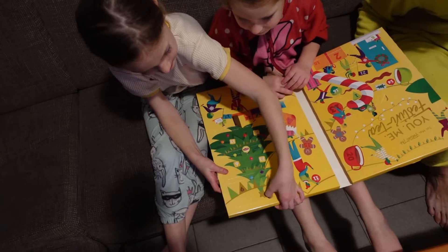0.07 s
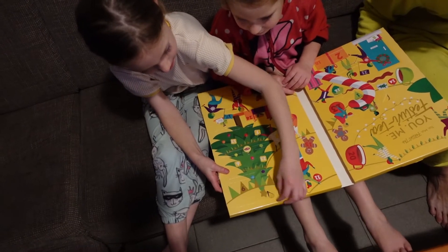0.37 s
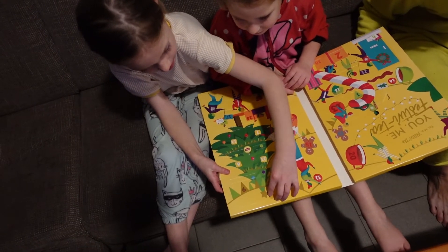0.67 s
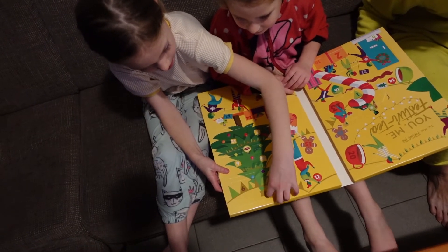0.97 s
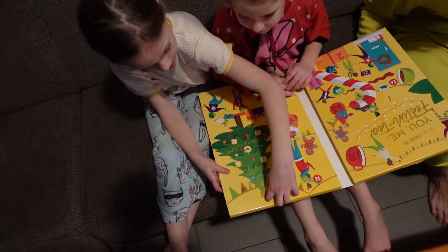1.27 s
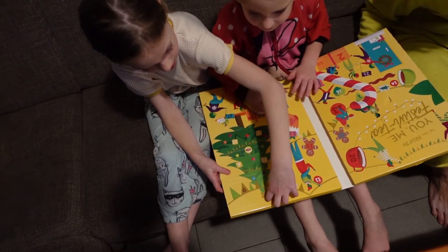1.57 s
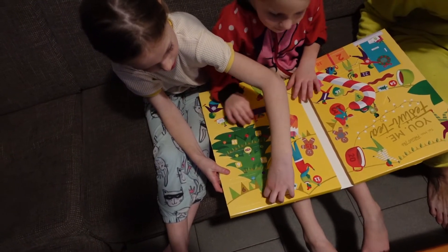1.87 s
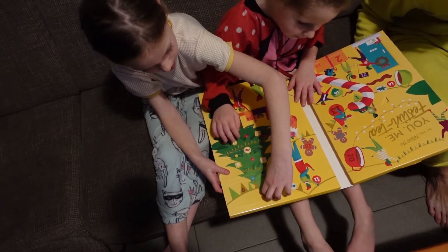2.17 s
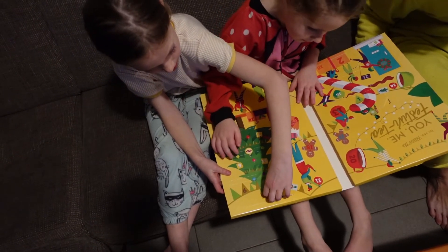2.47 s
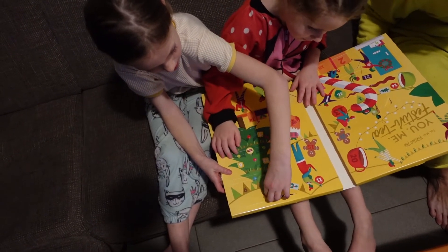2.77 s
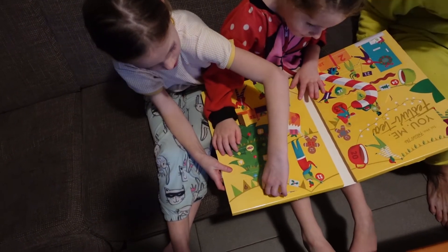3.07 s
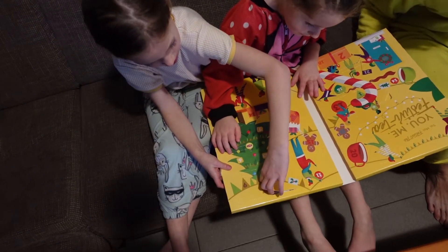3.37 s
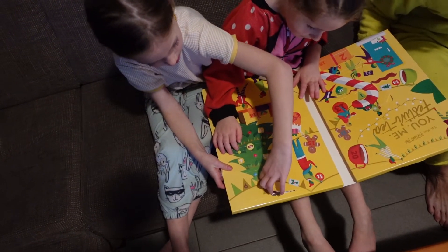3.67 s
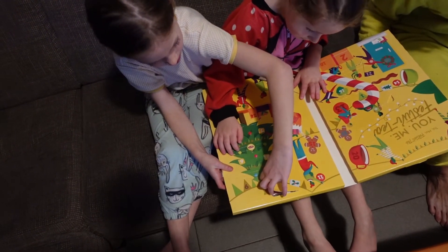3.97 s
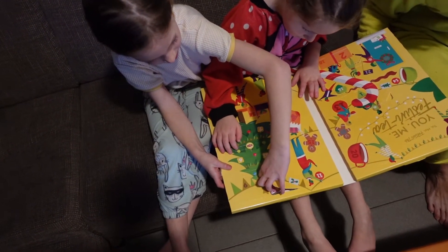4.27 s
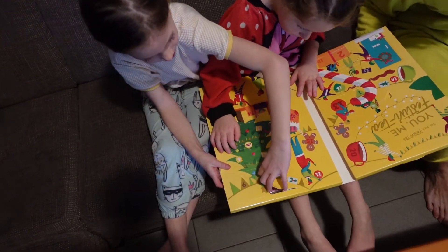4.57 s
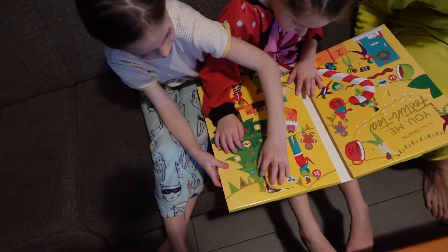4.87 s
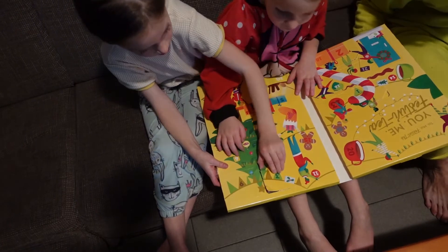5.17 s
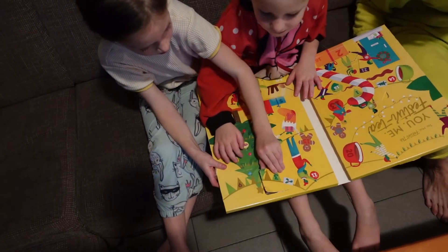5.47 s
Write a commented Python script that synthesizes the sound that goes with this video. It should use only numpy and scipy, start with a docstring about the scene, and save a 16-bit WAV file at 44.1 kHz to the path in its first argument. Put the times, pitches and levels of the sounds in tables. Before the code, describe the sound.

Fingers pry at the perforated doors of a big cardboard calendar in a quiet living room. Soft rubs and nail scrapes lead to a quick cluster of sharp cracks, then three separate, louder snaps, another short cluster and a last tear, ending in light ticking. Each crack knocks the hollow box slightly and has a short room echo. The nearby handheld microphone adds a low rumble and faint hiss.

```python
"""Paper bridges crack as two children pry at the perforated doors of a big cardboard calendar on their laps.
Each bridge fractures in milliseconds, an impulse that rings the door flap and thumps the hollow box. In
between, nails tick, fingers rub and judder, a sleeve brushes the lid and fine fibres crackle as doors rip open.
The living room answers with a short reverberation; the hand holding the phone adds a low rumble."""
import sys
import numpy as np
from scipy import signal
from scipy.fft import rfft, irfft
from scipy.io import wavfile
from scipy.ndimage import uniform_filter1d

SR = 44100
rng = np.random.default_rng(int(sys.argv[2]) if len(sys.argv) > 2 else 0)


def generate_wav(sig):
    """Save sig (samples, or channels by samples) to the path in sys.argv[1] as 16-bit PCM at SR."""
    pcm = np.round(np.clip(np.atleast_2d(sig).T, -1, 1) * 32767).astype(np.int16)
    wavfile.write(sys.argv[1], SR, pcm)


N = 251811
TIME = np.arange(N) / SR

# Spectra of still air with microphone hiss, the hand on the phone, rubbed card and tearing card.
# Each row: frequency in Hz, relative spectral density in dB.
AIR_SPECTRUM = [(41, -71), (70, -14), (108, -5.5), (364, -11.5), (457, -9.5), (585, -15.5), (1180, -15.5),
                (1380, -22.5), (1690, -14), (1980, -24), (8420, -29.5), (10600, -32.5), (15500, -33.5)]
HANDLING_SPECTRUM = [(8, 10.5), (18, -10.5), (28, 6.5), (38, -8.5), (50, -17), (75, -25.5), (130, -34.5),
                     (300, -64.5)]
RUB_SPECTRUM = [(88, -68), (150, -10.5), (445, -2), (583, -5.5), (781, -3.5), (912, -1), (1200, 3.5),
                (1480, -10), (1630, -3.5), (2140, -7), (5130, -17), (8490, -24.5), (10500, -33),
                (15500, -33)]
TEAR_SPECTRUM = [(100, -24), (200, -10), (450, -4.5), (580, -11), (800, -2), (1100, 0), (1500, -9),
                 (2000, -11.5), (2900, -13), (3800, -17), (5500, -16), (8800, -17.5), (11000, -28.5),
                 (15000, -31.5)]
# Shifts of grip on the phone. Each row: time of the peak in seconds, level in dB.
GRIPS = [(.19, -45.5), (.475, -41), (3.081, -38), (4.38, -38)]
# Fingers and sleeves sliding on the card. Each row: start and end in seconds, first and last relative
# level in dB, offset of the hiss in dB.
STROKES = [(0, 0.124, -41, -52, -9), (.74, 0.876, -54, -54.5, -25), (1.138, 1.366, -45, -49.5, -9),
           (2.01, 2.517, -54.5, -47, -4.5), (3.047, 3.17, -62, -46, -8), (4.615, 4.89, -59.5, -44, -3),
           (5.057, 5.37, -45, -56.5, -1), (5.6, 5.71, -53, -44, -21)]
# Scrapes along a door's edge. Each row: start and length in seconds, level in dB, grit from 0 (skin)
# to 1 (nail).
SCRAPES = [(0.158, 0.056, -44.5, 0.6), (0.216, 0.035, -40.5, 0.32), (0.394, 0.15, -72, 0.083),
           (.67, 0.049, -54, .36), (0.954, .1, -62, 0.046), (1.528, 0.031, -27.5, 0.53),
           (1.696, 0.013, -30.5, 0.76), (2.568, 0.017, -46, .8), (2.599, 0.043, -39.5, 0.28),
           (2.77, 0.03, -37, 0.87), (2.877, 0.011, -54, 0.47), (2.952, 0.13, -50.5, 0.056),
           (4.612, 0.058, -51, 0.25), (4.665, 0.047, -39, 0.36), (4.732, .033, -48.5, 0.34),
           (4.909, 0.066, -29, 0.41), (5.258, 0.037, -50.5, 0.56), (5.384, 0.021, -38, 0.82)]
# Reverberation of the room. Each row: frequency in Hz, time to fall 60 dB in seconds, relative level in dB.
ROOM_DECAY = [(180, 0.45, 0.5), (500, 0.41, 1), (1230, 0.47, 0), (2800, 0.5, 1), (5800, 0.49, 0),
              (8900, 0.38, -0.5), (12900, 0.29, 1)]
# Resonances of the hollow box. Each row: frequency in Hz, width in Hz, boost in dB.
BOX_MODES = [(245, 47, 3), (446, 18, 4.5), (659, 78, 5), (798, 26, 4), (1050, 690, 6), (1580, 170, 3.5),
             (2094, 23, 4.5), (2700, 460, 0.5)]
# The ranges of thud, body, snap and fizz. Each row: lower edge in Hz, upper edge in Hz.
BANDS = [(95, 650), (650, 1600), (1600, 4200), (4200, 15000)]
# Nail ticks and small creaks of the card. Each row: start in seconds, relative level in dB, pitch in Hz.
TICKS = [(0.0806, -33.5, 870), (0.1614, -49, 4060), (.218, -39, 2200), (0.233, -44, 6000),
         (0.6305, -48, 700), (0.6872, -47, 4600), (0.9125, -52.5, 8500), (1.5008, -40, 4740),
         (2.352, -54, 8000), (2.416, -54.5, 7000), (2.51, -43, 1000), (2.7721, -43.5, 1110),
         (2.7896, -49, 3200), (3.1258, -44.5, 794), (3.1464, -44, 1140), (3.3545, -37.5, 595),
         (3.4204, -37.5, 620), (3.456, -33.5, 610), (3.487, -37.5, 700), (3.8293, -43.5, 5970),
         (4.684, -42, 650), (4.818, -42, 403), (5.0596, -41, 1620), (5.11, -39.5, 1270),
         (5.2247, -47, 3770), (5.2428, -49, 4000), (5.2665, -47, 2580), (5.312, -42, 770),
         (5.389, -45, 980), (5.413, -40, 1400), (5.4794, -37.5, 580), (5.5328, -38.5, 1500),
         (5.57, -38, 960), (5.7028, -40, 3380)]
# Fine card fibres ripping as a door tears open. Each row: start in seconds, length in seconds, level in dB.
RIPS = [(0.156, 0.13, -59), (1.53, 0.055, -41), (2.583, 0.035, -53), (4.261, 0.035, -44.5),
        (4.335, 0.016, -39.5)]
# A sleeve brushing the lid. Each row: start in seconds, length in seconds, pitch in Hz, level in dB.
SWISHES = [(0.405, 0.12, 8600, -66), (2.191, 0.22, 3860, -55)]
# A pressed fingertip juddering. Each row: start and end in seconds, slips per second, level in dB.
JUDDERS = [(0.764, 0.883, 46, -57.5), (0.971, 1.054, 49, -52), (1.131, 1.26, 85, -56),
           (1.286, 1.35, 24, -49), (2.029, 2.092, 75, -53.5)]
# Bridges giving way. Each row: start in seconds, relative level in dB, flap pitch in Hz, flap's share of
# the body from 0 to 1, edge pitch in Hz, sharpness in dB, thud against body in dB, tear time in seconds.
CRACKS = [(1.369, -13, 1276, 0.42, 1920, 0, -10.5, 0.002), (1.536, -16, 1290, 0.5, 6660, 3.5, -15, 0.0031),
          (1.551, -14, 1050, 0.2, 1720, -1, -12, 0.0025), (1.5626, -23, 1100, 0.5, 5000, -3, -11, 0.00075),
          (1.5734, -18, 1000, 0.28, 2130, -2.5, -7, 0.0039),
          (1.717, -15.5, 1045, 0.17, 2130, -2, -14, 0.0067),
          (1.7831, -17, 1044, 0.38, 3680, 0, -11, 0.0057),
          (1.827, -17, 1050, 0.24, 7560, -1.5, -6.5, 0.0037),
          (2.584, -25, 1140, 0.3, 5950, 1.5, -6, 0.0052), (2.619, -36.5, 1680, 0.3, 3090, 4.5, 2, 0.0085),
          (3.1826, -10.5, 1044, 0.71, 2500, -5, -14.5, 0.000625),
          (3.5388, -10, 1080, 0.58, 5840, 0.5, -12, 0.00091),
          (3.941, -9, 1290, 0.35, 3700, 0, -11.5, 0.00053),
          (4.2595, -14.5, 1240, 0.28, 2700, 2.5, -5, 0.0035),
          (4.2926, -20.5, 1630, 0.22, 5100, 6, -5, 0.0035),
          (4.3338, -21.5, 1130, 0.7, 8900, 6, -3.5, 0.003),
          (4.3398, -15.5, 676, 0.22, 7200, -4.5, -4.5, 0.0046),
          (4.917, -28, 1580, 0.2, 3700, 8.5, -5, 0.0038), (4.958, -20.5, 1180, 0.25, 4370, -3, -7, 0.0096)]

TYPICAL_TEAR_S, TYPICAL_EDGE_HZ = 0.0023, 4200
BLOW_S = 0.01  # a short sound's level is that of its energy spread over this time


def undb(db):
    """Amplitude grows tenfold for every 20 dB."""
    return 10 ** (np.asarray(db) / 20)


def unit(x):
    """Normalise to an rms amplitude of 1."""
    return x / np.sqrt(np.mean(x ** 2) + 1e-20)


def blow(x, db):
    """Energy is power times duration: give a transient the energy this level carries in BLOW_S."""
    return x * undb(db) * np.sqrt(BLOW_S * SR / (np.sum(x ** 2) + 1e-20))


def add(track, start, x):
    """Superposition: x adds to the track from start, in seconds."""
    i = max(int(start * SR), 0)
    track[i:i + len(x)] += x[:max(len(track) - i, 0)]


def band(x, low_hz, high_hz, order=3):
    """A causal band-pass filter."""
    return signal.lfilter(*signal.butter(order, [low_hz, high_hz], "band", fs=SR), x)


def contour(points, size):
    """Interpolate (Hz, value) points over log frequency at the bins of a transform."""
    hz, value = np.transpose(points)
    return np.interp(np.log(np.fft.rfftfreq(size, 1 / SR) + 1), np.log(hz), value)


def colour(x, spectrum):
    """Filtering multiplies spectra; the result has rms 1."""
    return unit(irfft(rfft(x) * undb(contour(spectrum, len(x))), len(x)))


def wander(per_s):
    """A moving average smooths random steps into a drift of rms 1."""
    step = int(SR / per_s)
    steps = np.repeat(rng.standard_normal(N // step + 1), step)[:N]
    return unit(uniform_filter1d(steps, step))


def air_and_handling(air_db=-56, hand_db=-39, grip_s=0.072):
    """Structure-borne noise: over quiet air, the hand rumbles on the phone, more as its grip shifts."""
    air = colour(rng.standard_normal(N), AIR_SPECTRUM) * undb(air_db + 0.46 * wander(1.8))
    hand = colour(rng.standard_normal(N), HANDLING_SPECTRUM)
    hand /= np.sqrt(uniform_filter1d(hand ** 2, SR // 6))  # even out the noise's own swells
    shifts = sum(undb(db) * np.exp(-((TIME - peak) / grip_s) ** 2) for peak, db in GRIPS)
    return air + hand * (undb(hand_db + 2 * wander(9)) + shifts)


def friction(grain_db, slip_db, split_hz=2500, grain_samples=14):
    """Stick-slip friction releases uneven grains in surges; returns a dull body and a dry hiss."""
    grains = np.repeat(rng.exponential(size=N // grain_samples + 1), grain_samples)[:N]
    roughness = undb(grain_db * np.minimum(grains, 4))
    rub = colour(rng.standard_normal(N) * roughness, RUB_SPECTRUM) * undb(slip_db * wander(120))
    return np.array([unit(band(rub, 184, split_hz)), unit(band(rub, split_hz, 14000))])


def rubbing(fade_s=0.034, light_scrape_db=-51):
    """Friction noise grows with pressure: skin slides softly on the card, a nail scrapes coarsely."""
    skin = friction(grain_db=2.2, slip_db=1.5)
    nail = friction(grain_db=5.5, slip_db=2.5)
    out = np.zeros(N)
    for start, end, first_db, last_db, hiss_db in STROKES:
        contact = np.clip(np.minimum(TIME - start, end - TIME) / fade_s + 1, 0, 1)
        pressure = undb(np.interp(TIME, [start, end], [first_db, last_db]))
        body, hiss = skin
        out += contact * pressure * (body * undb(-3) + hiss * undb(hiss_db - 4))
    for start, length_s, db, grit in SCRAPES:
        span = slice(int(start * SR), int((start + length_s) * SR))
        body, hiss = np.sqrt(1 - grit) * skin[:, span] + np.sqrt(grit) * nail[:, span]
        hiss_db = (db + light_scrape_db) / 2  # pressing adds more body than hiss
        along = np.linspace(0, 1, len(body))
        arch = 2 * np.sqrt(along * (1 - along))
        add(out, start, arch * (body * undb(db) + hiss * undb(hiss_db)))
    return out


def room(x, first_s=0.0018, build_s=0.0096, early_db=3, early_s=0.0053):
    """Reverberation: sofa and floor reflect first, then the walls' diffuse field decays exponentially."""
    t = np.arange(SR * 3 // 4) / SR
    noise = rfft(rng.standard_normal(len(t)))
    tail = np.zeros(len(t))
    for hz, t60, db in ROOM_DECAY:
        weight = contour([(row[0], row[0] == hz) for row in ROOM_DECAY], len(t))
        tail += undb(db - 60 * t / t60) * irfft(noise * weight, len(t))
    tail *= np.clip((t - first_s) / build_s, 0, 1) * undb(early_db * np.exp(-t / early_s))
    return signal.fftconvolve(x, tail / np.sqrt(np.sum(tail ** 2)))[:N]


def card_response(size=2048):
    """The box's impulse response: modal peaks on the card's spectrum, with minimum phase."""
    hz = np.fft.rfftfreq(size, 1 / SR)
    modes_db = sum(db / (1 + (2 * (hz - centre) / width) ** 2) for centre, width, db in BOX_MODES)
    cepstrum = irfft(np.log(undb(contour(TEAR_SPECTRUM, size) + modes_db)))
    # folding the cepstrum onto positive time gives the promptest causal response
    cepstrum[1:size // 2] *= 2
    cepstrum[size // 2 + 1:] = 0
    return irfft(np.exp(rfft(cepstrum)))


def fibres(card, tear_s, spray_db, settle_db, settle_s):
    """Source and filter: one break, a spray of snapping fibres and a settling crinkle drive the card."""
    t = np.arange(len(card)) / SR
    tearing = np.exp(-t / tear_s)
    snaps = rng.standard_normal(len(t)) * rng.exponential(size=len(t))
    crinkle = rng.standard_normal(len(t)) * np.exp(-t / settle_s) * (1 - tearing)
    force = blow(snaps * tearing, spray_db) + blow(crinkle, settle_db)
    force[0] += np.sqrt(BLOW_S * SR)  # the break, an impulse of 0 dB
    return signal.fftconvolve(force, card)[:len(t)]


def ticks(card, rise_db_per_octave=3, fall_db_per_octave=6):
    """Weak impulses excite the box as nails catch and the card creaks, each loudest near one pitch."""
    out = np.zeros(N)
    centres_hz = np.sqrt(np.prod(BANDS, axis=1))
    for start, db, hz in TICKS + fumbles():
        tear = fibres(card, tear_s=0.0025, spray_db=8, settle_db=-1, settle_s=0.009)
        octaves = np.log2(centres_hz / hz)
        levels_db = db + octaves * np.where(octaves < 0, rise_db_per_octave, -fall_db_per_octave)
        for edges, band_db in zip(BANDS, levels_db):
            add(out, start, blow(band(tear, *edges), band_db))
    return undb(3) * out


def rips(grain_db=4, band_hz=(8500, 18300)):
    """Tiny fractures of fine card fibres ripping merge into a bright, fading crackle."""
    out = np.zeros(N)
    for start, length_s, db in RIPS:
        size = int(length_s * SR)
        grains = rng.standard_normal(SR // 4)
        grains *= undb(grain_db * np.minimum(rng.exponential(size=len(grains)), 4))
        crackle = band(grains, *band_hz, order=2)[:size]
        fade = np.sqrt(np.linspace(1, 0, size))
        add(out, start, unit(crackle * fade) * undb(db))
    return out


def swishes():
    """Cloth sliding on glossy card makes narrow-band friction noise that swells and fades."""
    out = np.zeros(N)
    for start, length_s, hz, db in SWISHES:
        hiss = unit(band(rng.standard_normal(SR), 0.95 * hz, 1.05 * hz, order=1))
        size = int(length_s * SR)
        add(out, start, hiss[:size] * np.sqrt(np.hanning(size)) * undb(db))
    return out


def judders(card, slip_s=0.012, unevenness=0.1, scatter_db=5):
    """Stick-slip oscillation: a fingertip slips at uneven steps, each a brief soft rub on the box."""
    out = np.zeros(N)
    slip = np.hanning(int(slip_s * SR))
    for start, end, rate, db in JUDDERS:
        chance = rng.standard_normal((30, 2 + len(slip)))
        timing, strengths, noises = chance[:, 0], chance[:, 1], chance[:, 2:]
        times = start + (np.cumsum(np.exp(unevenness * timing)) - 1) / rate
        for onset, strength, noise in zip(times[times < end], strengths, noises):
            rub = band(signal.fftconvolve(slip * noise, card), 259, 1800, order=2)
            add(out, onset, blow(rub, db + scatter_db * strength))
    return out


def strain(door, length_s):
    """Under rising stress the first fibres fail, in a growing crackle just before the break."""
    force = rng.standard_normal(len(door))[:int(length_s * SR)]
    return signal.fftconvolve(force * np.linspace(0, 1, len(force)), door)


def flap_ring(hz, size, decay_cycles=4, rise_s=0.00022):
    """Free vibration: the released flap springs back as a damped oscillator."""
    t = np.arange(size) / SR
    swing = np.sin(2 * np.pi * hz * t) * np.exp(-t * hz / decay_cycles) * (1 - np.exp(-t / rise_s))
    return blow(band(swing, 400, 4300, order=2), 0)


def box_bounce(hz=124, decay_s=0.012):
    """A damped mass on a spring: the whole box bounces on the laps when a bridge lets go."""
    t = np.arange(SR // 8) / SR
    return np.sin(2 * np.pi * hz * t) * np.exp(-t / decay_s)


def crack(tear, flap, share, levels_db):
    """Four bands superpose: the box's thud, a body with the flap's note, the fibres' snap and fizz."""
    thud, body, snap, fizz = (blow(band(tear, *edges), 0) for edges in BANDS)
    body = share * flap + (1 - share) * body
    return sum(blow(part, db) for part, db in zip((thud, body, snap, fizz), levels_db))


def tearing_bridges(card):
    """Fracture releases stored elastic energy; returns the direct sound and what goes to the room."""
    direct, to_room = np.zeros(N), np.zeros(N)
    for start, db, flap_hz, share, edge_hz, sharp_db, thud_db, tear_s in CRACKS:
        # a higher edge trades snap for fizz; a slower tear snaps more fine fibres
        octaves = np.log2(edge_hz / TYPICAL_EDGE_HZ)
        slowness = np.log2(tear_s / TYPICAL_TEAR_S)
        snap_db = sharp_db - 5.5 - 2.5 * octaves
        fizz_db = sharp_db - 16.5 + 3 * octaves + 1.5 * slowness
        levels_db = db + np.array([thud_db, 0, snap_db, fizz_db])
        flap = flap_ring(flap_hz, len(card))
        # the stiff strip beside each bridge has a treble resonance of its own
        door = card + undb(-2) * band(card, 0.67 * edge_hz, 1.255 * edge_hz, order=1)
        tear = fibres(door, tear_s, spray_db=23, settle_db=7.5, settle_s=0.018)
        strain_s = 2 * tear_s
        add(direct, start - strain_s, blow(strain(door, strain_s), db - 28))
        add(direct, start, crack(tear, flap, share, levels_db))
        add(direct, start, blow(box_bounce(), db + thud_db - 18.5))
        # the walls hear all sides of the card: less flap note, and the fibres' interference evens out
        radiated = crack(door, flap, 0.37 * share, levels_db + [0, 0, 0, 2])
        add(to_room, start, radiated * undb(-12 - slowness))  # a quick break sends a little more
    return undb(1.47) * direct, undb(1.9) * to_room


def fumbles(count=5, start=5.6, per_s=48):
    """A jittered impulse train: fingers fumble at the opened door; returns rows like those of TICKS."""
    timing, strength, pitch = rng.standard_normal((count, 3)).T
    times = start + (np.arange(count) + 0.12 * timing) / per_s
    levels_db = -43.5 - 2 * strength
    pitches_hz = 700 * np.exp(0.17 * pitch)
    return list(zip(times, levels_db, pitches_hz))


def scene():
    """Direct sound and reverberation superpose on the background, in one channel."""
    card = card_response()
    cracks, to_room = tearing_bridges(card)
    touches = ticks(card) + rubbing() + judders(card) + swishes() + rips()
    reverberation = room(to_room + undb(-11) * touches)
    return (cracks + touches + reverberation + air_and_handling())[None]


def record(dry):
    """Saturation and band limiting: the phone clips peaks at full scale and cuts the highest treble."""
    low_pass = signal.ellip(10, 0.1, 70, 15900, fs=SR, output="sos")
    return signal.sosfilt(low_pass, np.clip(dry, -1, 1))


dry = scene()
out = record(dry)
generate_wav(out)
```